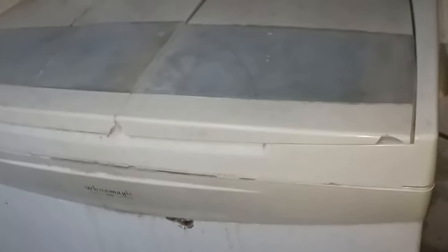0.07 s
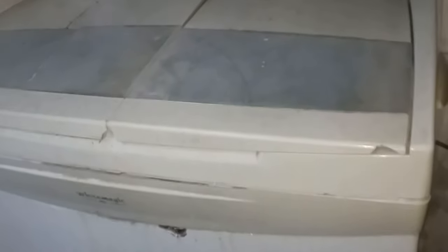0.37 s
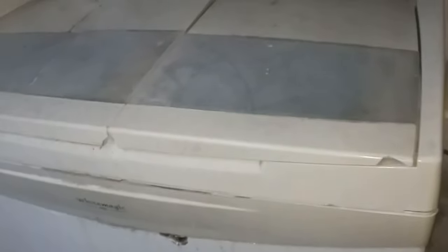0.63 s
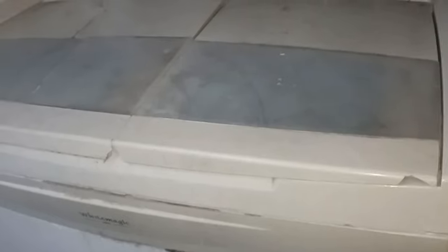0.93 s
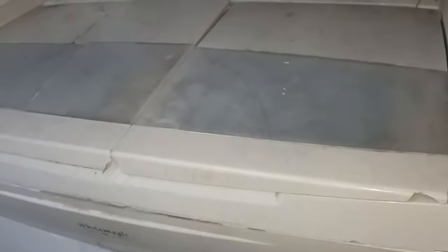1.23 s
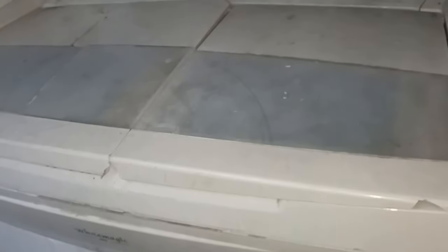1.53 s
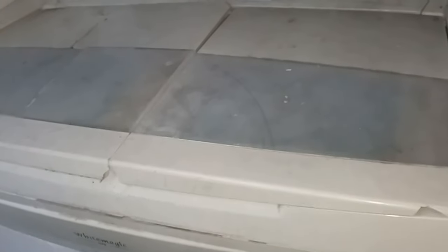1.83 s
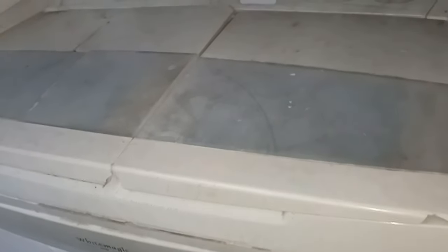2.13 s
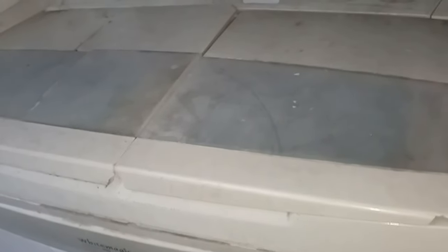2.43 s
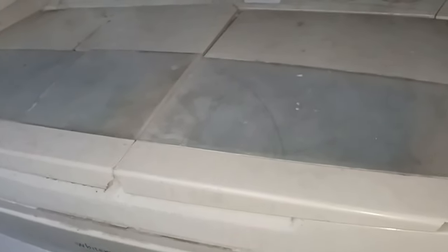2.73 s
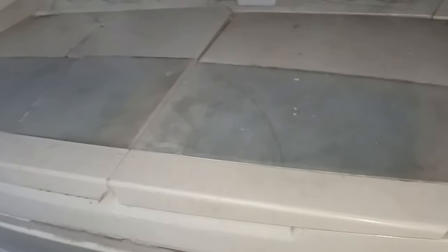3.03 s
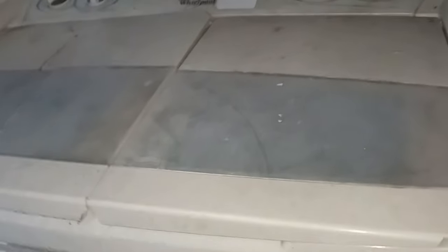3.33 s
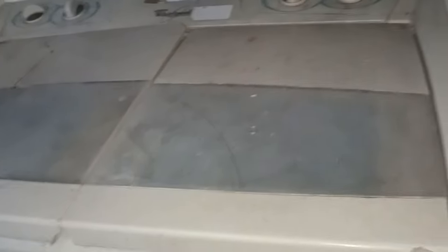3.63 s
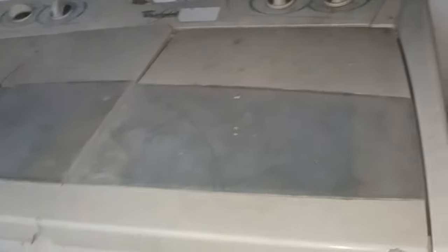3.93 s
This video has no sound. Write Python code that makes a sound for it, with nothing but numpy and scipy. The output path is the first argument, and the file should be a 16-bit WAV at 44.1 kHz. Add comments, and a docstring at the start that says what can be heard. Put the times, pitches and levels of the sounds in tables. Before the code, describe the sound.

Rhythmic heavy thumps and plastic rattling from a spinning washing machine, over a low rumble.

```python
"""Washing machine spinning out of balance

An old top-loader, heard from just above its plastic lid in a small room. The unbalanced tub strikes the
cabinet in the same order of knocks, thumps and rebounds on every turn, exciting its low modes. Loose
panels and the lid chatter after it, the rim rubs, and a faint squeal sounds near the end.
Motor rumble, a thin hiss of flung water and ticking drops run underneath."""
import sys
import numpy as np
from scipy import signal
from scipy.fft import rfft, irfft
from scipy.io import wavfile

SR = 44100
rng = np.random.default_rng(int(sys.argv[2]) if len(sys.argv) > 2 else 0)


def waveform_to_disk(signal):
    """Save audio, clipped to [-1, 1], as 16-bit WAV at the path in sys.argv[1]."""
    frames = np.transpose(np.atleast_2d(signal))
    scaled = np.clip(frames, -1, 1) * 32767
    samples = np.round(scaled).astype(np.int16)
    wavfile.write(sys.argv[1], SR, samples)


N = 176400

# the tub's first contact in each turn: (time [s], force [dB], hop bout gain [dB], slap bout gain [dB])
TURNS = [(-.203, 5, 0, 0), (.0702, -0.8, 2, 0.5), (.344, -0.76, 4, 1.5), (0.6182, -0.14, 4.5, 0.5),
         (0.8921, -.5, 0, 2), (1.1674, -0.3, -0.5, -2), (1.4416, 0, 0.5, 0), (1.7162, -0.4, 5.5, 0.5),
         (1.99, 0, 0.5, -1), (2.2638, -.2, 1, -2), (2.5384, -0.4, 1, -1), (2.812, -0.1, 2.5, -2.5),
         (3.0848, 0, -0.5, 0), (3.3565, 0.35, -1.5, -1.5), (3.6272, -0.2, -2, 0.5), (3.8987, 0.3, -1, 0)]
# bouts of chatter within a turn: (delay [s], length [s], side panel level [dB], lid level [dB])
BOUTS = [(.0003, 0.0022, -2, -14.5), (.008, .014, 1.5, -6), (0.019, .013, -2.5, -8), (0.042, 0.022, -3, -7),
         (.061, .022, -4, -2.5), (0.088, .015, 0.5, 5.5), (0.107, .016, -2.5, -4), (0.125, .022, -2.5, -10),
         (.148, .014, -2, -11.5), (0.161, 0.019, -15.5, -25)]
# spectrum of flung water: (frequency [Hz], spectral level [dB])
SPRAY = [(1000, -2), (3500, 0), (5600, 5), (7500, -9), (9500, -8.5), (12000, -2.5), (15500, -7)]


def cabinet():
    """Modal response: each blow of the tub, shorter when harder, sets the cabinet's modes booming."""
    # blows within a turn: (delay [s], level [dB], hardness as centre frequency [Hz])
    blows = [(0.0009, -3.5, 212.4), (0.015, -1.0, 500), (0.0269, 4, 170), (0.0348, -4.5, 83.0),
             (0.0637, -8, 423), (0.0923, -1.0, 144), (0.1086, -4.5, 280), (0.1304, -9, 270),
             (0.1524, -3, 260), (0.1742, -3.5, 65), (0.1879, -4.5, 103.4), (0.2279, -18, 194)]
    # cabinet modes: (frequency [Hz], level [dB], T60 [s])
    modes = [(71, -24.5, 0.32), (91.9, -24, 0.24), (117.7, -21.5, 0.27), (144.7, -22, 0.27),
             (173.8, -22.5, 0.34), (215.2, -23, 0.3), (284.1, -14.5, 0.17), (322.7, -20.5, .18),
             (413.8, -20, 0.12), (454.2, -27.5, 0.19), (588, -29.5, .16), (684, -28.5, 0.12)]
    jitter_s, spread_db = .00015, 1.07
    starts, force_db, *_ = np.transpose(TURNS)
    push = 0
    for delay, db, hz in blows:
        late, stronger = rng.standard_normal((2, len(starts)))
        train = clicks(starts + delay + jitter_s * late, from_db(force_db + db + spread_db * stronger))
        w = 2 * np.pi * hz
        rounding = signal.bilinear([w, 0], [1, w, w * w], SR)
        push = push + signal.lfilter(*rounding, train)
    t = np.arange(SR // 2) / SR
    sharp_share, settle_s = 0.028, 0.035  # a struck panel rings a little sharp, then settles
    warped_t = t - sharp_share * settle_s * np.expm1(-t / settle_s)
    ring = sum(from_db(db - 60 * t / t60) * np.sin(2 * np.pi * hz * warped_t) for hz, db, t60 in modes)
    boom = sound_through(push, ring[None])
    return from_db(-1) * signal.sosfilt(signal.butter(6, 56, "high", fs=SR, output="sos"), boom)


def clack():
    """Hard impact: the first contact of each turn excites a few heavily damped plastic modes."""
    # plastic modes: (frequency [Hz], level [dB], T60 [s])
    modes = [(517, -16, 0.016), (756, -2, 0.064), (946, 7.5, 0.016), (1163, -1, .03), (1557, -2.5, 0.036),
             (1800, -6, .035), (3100, -17, 0.01)]
    gain_db, spread_db, delay_s, attack_s = -27, 0.6, 0.00042, 0.00037
    starts, force_db, *_ = np.transpose(TURNS)
    t = np.arange(SR // 10) / SR
    out = 0
    for hz, db, t60 in modes:
        sizes = from_db(gain_db + force_db + spread_db * rng.standard_normal(len(starts)))
        ring = from_db(db - 60 * t / t60) * np.cos(2 * np.pi * hz * t) * -np.expm1(-t / attack_s)
        out = out + sound_through(clicks(starts + delay_s, sizes), ring[None])
    return signal.sosfilt(signal.butter(2, 60, "high", fs=SR, output="sos"), out)


def chatter():
    """Contact rattle: the dull side panels and the brighter lid each tap at two places."""
    # spectra of a tap on a panel and on the lid: (frequency [Hz], spectral level [dB])
    panel = [(60, -37), (300, -10), (500, 3), (750, 3.5), (1150, -3), (1800, -4), (2600, -20.5),
             (4000, -23.5), (8000, -36), (15000, -35)]
    lid = [(400, -6), (900, -8), (1750, 2), (2800, -2.5), (3700, -9.5), (6200, -13.5), (8000, -23),
           (12000, -16.5), (15500, -21)]
    _, _, panel_db, lid_db = np.transpose(BOUTS)
    out = 0
    for _ in range(2):
        out = out + sound_through(taps(panel_db - 3.5), plastic_response(panel, t60=0.086))
        out = out + sound_through(taps(lid_db - 7), plastic_response(lid, t60=0.069))
    return out


def taps(levels_db, count=4):
    """Periodic forcing: a loose part repeats nearly the same bouts of taps on every turn."""
    jitter_s, tap_spread_db, bout_spread_db = .0004, 3, 2
    hop_bout, slap_bout = 4, 5  # rows of BOUTS in which the lid hops and slaps down
    starts, force_db, hop_db, slap_db = np.transpose(TURNS)[:, :, None]
    train = 0
    for bout, ((delay, length, *_), db) in enumerate(zip(BOUTS, levels_db)):
        pattern = length * (np.arange(count) + rng.random(count)) / count
        times = starts + delay + pattern + jitter_s * rng.standard_normal((len(starts), count))
        sizes = from_db(tap_spread_db * rng.standard_normal(times.shape)) * rng.choice([-1, 1], count)
        sizes /= np.linalg.norm(sizes, axis=1, keepdims=True)
        chance_db = bout_spread_db * rng.standard_normal(starts.shape)
        turn_db = {hop_bout: hop_db, slap_bout: slap_db}.get(bout, chance_db)
        train = train + clicks(times, sizes * from_db(force_db + db + turn_db))
    return train


def plastic_response(spectrum, t60):
    """Impulse response of plastic: dense modes die fast, a few ring on, and the room reverberates."""
    # resonances of the plastic: (frequency [Hz], bandwidth [Hz], lift [dB])
    resonances = [(714, 12, -0.5), (888, 18, 8), (1041, 32, 7), (1136, 38, 5.5), (1740, 30, -0.5),
                  (2660, 150, 4), (2873, 29, 3)]
    room_db, room_t60 = -23, 0.51
    t = np.arange(SR // 2) / SR
    x = coloured(spectrum, len(t)) * (from_db(-60 * t / t60) + from_db(room_db - 60 * t / room_t60))
    for hz, width, lift_db in resonances:
        x = x + (from_db(lift_db) - 1) * signal.lfilter(*signal.iirpeak(hz, hz / width, SR), x)
    return x / np.sqrt(np.sum(x ** 2) / 2)


def rubbing():
    """Sliding friction: the tub's rim gives a short rising tone each turn; once a thin squeal joins in."""
    wobble = 0.44 * drift(250)
    rubs = sum(friction(start + .152, width_s=0.012, hz=1152.5, hz_per_s=3700, db=force_db - 36.5,
                        wobble=wobble) for start, force_db, *_ in TURNS)
    squeal = friction(3.79, width_s=.14, hz=3060, hz_per_s=0, db=-51, wobble=1.1 * drift(120))
    return rubs + squeal


def friction(peak_s, width_s, hz, hz_per_s, db, wobble):
    """Phase modulation roughens a friction tone that swells and fades."""
    t = np.arange(N) / SR - peak_s
    swell = from_db(db) * np.exp(-.5 * (t / width_s) ** 2)
    return swell * np.sin(2 * np.pi * (hz + .5 * hz_per_s * t) * t + wobble)


def rumble():
    """Rotating machinery noise: motor and drum give a low broad band, the drive a faint wavering whine."""
    # motor and drum: (frequency [Hz], spectral level [dB])
    spectrum = [(25, -38), (47, -34), (66, 0.5), (105, -0.5), (300, 0), (500, -10.5), (800, -14),
                (1200, -24.5), (2000, -25.5), (3500, -40), (8000, -64), (16000, -60)]
    # tones of the drive: (frequency [Hz], level [dB])
    tones = [(704, -51), (886, -51.5), (1025, -56)]
    t = np.arange(N) / SR
    whine = sum(from_db(db) * np.sin(2 * np.pi * hz * t + 0.9 * drift(20)) for hz, db in tones)
    return from_db(-30) * coloured(spectrum, N) + whine


def drops():
    """Shot noise: flung drops tick against the outer tub at random."""
    drops_per_s, gain_db, spread_db = 75, -32.5, 5
    hits = rng.random(N + SR) < drops_per_s / SR
    sizes = from_db(gain_db + spread_db * np.minimum(rng.standard_normal(N + SR), 2))
    return sound_through(hits * sizes, plastic_response(SPRAY, t60=0.016))


def spray():
    """Amplitude-modulated noise: flung water hisses unsteadily, with a few brief spurts."""
    # spurts of water: (time [s], level [dB], Gaussian width [s])
    spurts = [(.272, -42.5, 0.01), (.512, -47, 0.017), (1.483, -40, 0.003), (1.926, -59, .005),
              (2.227, -46, .006), (2.249, -43, .003), (2.322, -48, 0.0027), (3.031, -49, .003)]
    # spectrum of a spurt: (frequency [Hz], spectral level [dB])
    spurt_spectrum = [(3000, -36), (5500, -23), (8000, -24), (11000, -10), (12100, 5), (13200, -10),
                      (15500, -7)]
    t = np.arange(N) / SR
    hiss = coloured(SPRAY, N) * from_db(-56 + 2 * drift(40))
    swells = sum(from_db(db) * np.exp(-.5 * ((t - time) / width) ** 2) for time, db, width in spurts)
    return hiss + swells * coloured(spurt_spectrum, N)


def coloured(spectrum, size):
    """Partial coherence: shaped stereo noise of rms 1, alike in the bass and diffuse in the treble."""
    # likeness of left and right: (frequency [Hz], correlation [ratio])
    coherence = [(60, .97), (280, 0.9), (500, 0.8), (1000, 0.3), (2000, -0.01), (15000, 0.02)]
    hz = np.maximum(np.fft.rfftfreq(size, 1 / SR), 1)
    mid, side = np.exp(2j * np.pi * rng.random((2, len(hz))))
    alike = at_hz(coherence, hz)
    stereo = np.sqrt(1 + alike) * mid + np.sqrt(1 - alike) * side * [[1], [-1]]
    x = irfft(from_db(at_hz(spectrum, hz)) * stereo, size)
    return x / x.std()


def clicks(times, sizes):
    """An impulse train that begins one second early, so that the machine is already running."""
    out = np.zeros(N + 2 * SR)
    np.add.at(out, ((np.ravel(times) + 1) * SR).astype(int), np.ravel(sizes))
    return out[:N + SR]


def sound_through(train, response):
    """Convolution of a train with an impulse response, less the one-second run-in."""
    return signal.fftconvolve(train[None], response, axes=1)[:, SR:SR + N]


def drift(rate):
    """Random modulation: straight lines join `rate` standard normal values a second."""
    knots = rng.standard_normal(int(rate * N / SR) + 2)
    return np.interp(np.arange(N) * rate / SR, np.arange(len(knots)), knots)


def at_hz(points, hz):
    """Interpolation on a log-frequency axis."""
    f, value = np.transpose(points)
    return np.interp(np.log(hz), np.log(f), value)


def from_db(db):
    """Decibels to amplitude ratio."""
    return 10 ** (np.asarray(db) / 20)


def scene():
    """Interaural time and level differences place the whole machine slightly to the right."""
    # stereo balance: (frequency [Hz], left minus right level [dB])
    balance = [(60, -1), (110, -0.5), (200, -3.5), (380, 1.5), (700, -1), (1290, -3), (2380, -2.5),
               (4400, 1), (8120, -1.5), (15000, -2.5)]
    left_lag_s = .0001
    hz = np.maximum(np.fft.rfftfreq(2 * N, 1 / SR), 1)
    gains = from_db(at_hz(balance, hz) * [[.5], [-.5]])
    lag = np.exp(-2j * np.pi * hz * left_lag_s * [[1], [0]])
    machine = cabinet() + clack() + chatter() + rubbing() + rumble() + spray() + drops()
    return irfft(rfft(machine, 2 * N) * gains * lag)[:, :N]


def record(dry):
    """Band limiting: a steep low-pass cuts the treble above 15.8 kHz."""
    return signal.sosfilt(signal.ellip(12, .1, 90, 15800, fs=SR, output="sos"), dry)


dry = scene()
out = record(dry)
waveform_to_disk(out)
```